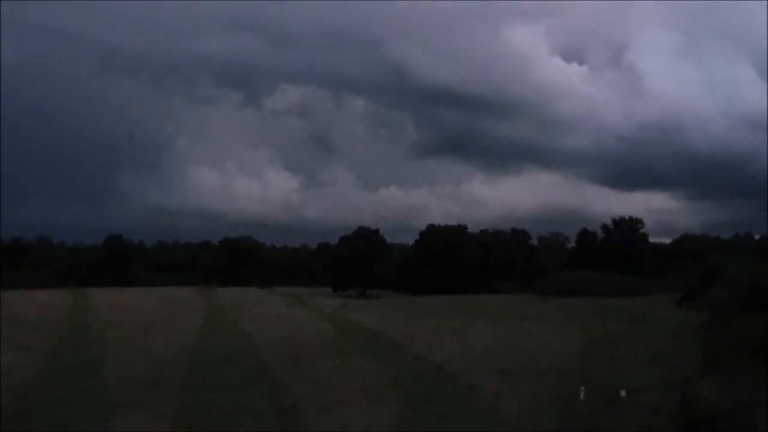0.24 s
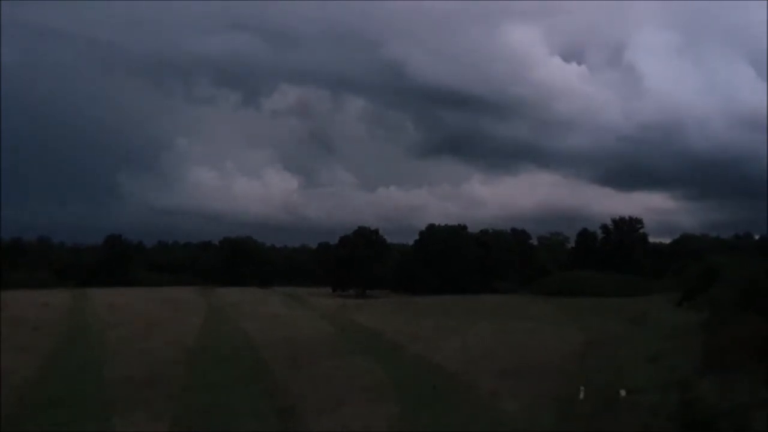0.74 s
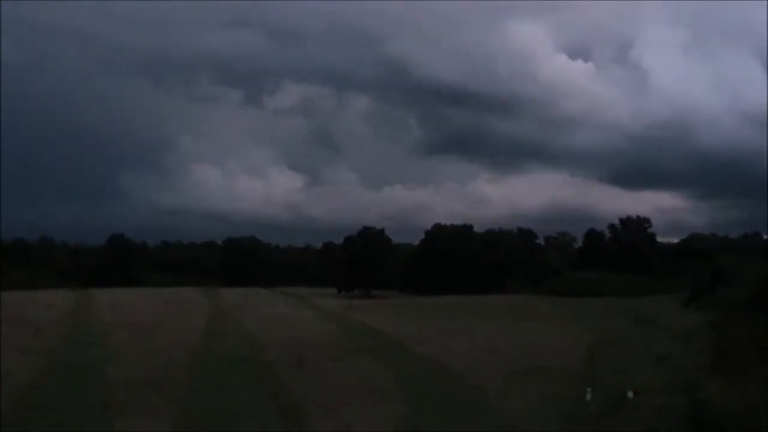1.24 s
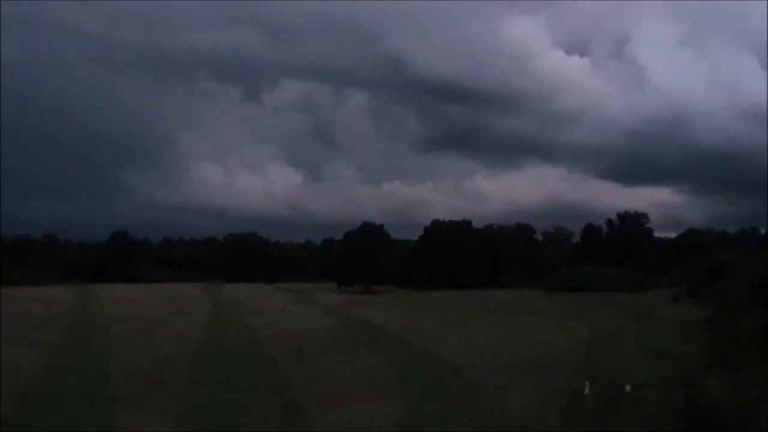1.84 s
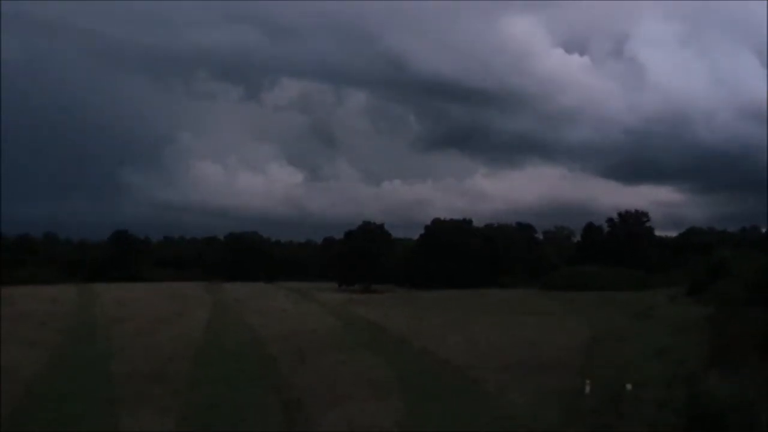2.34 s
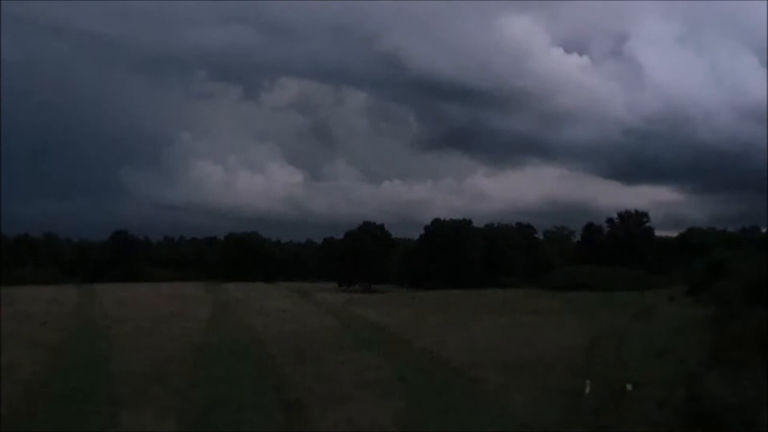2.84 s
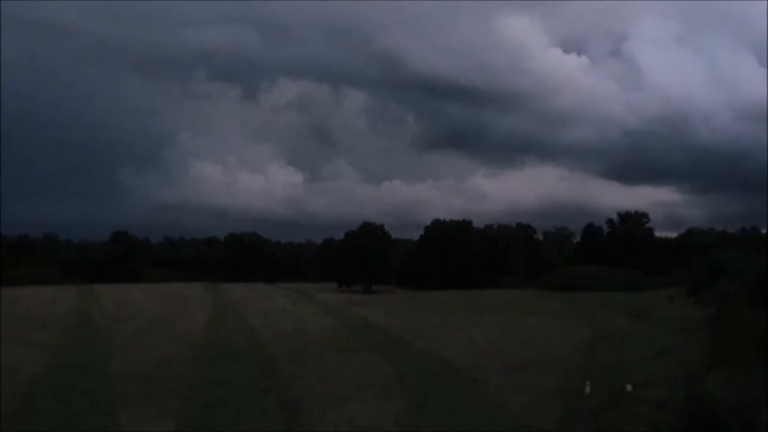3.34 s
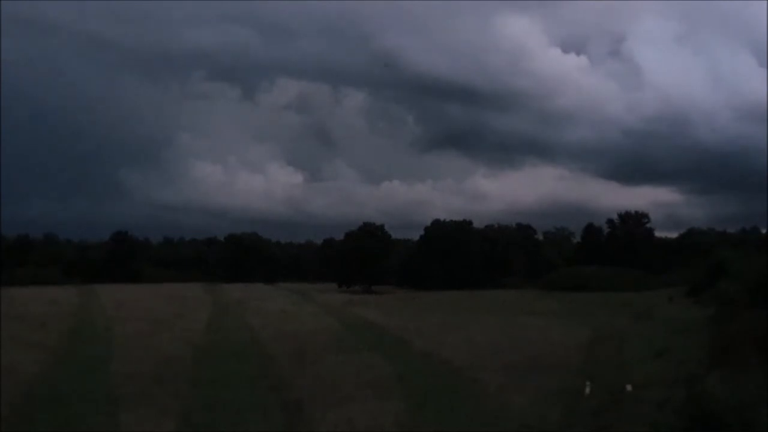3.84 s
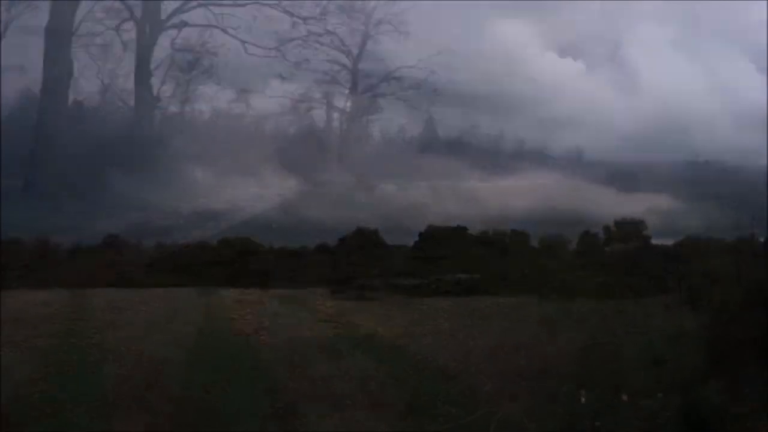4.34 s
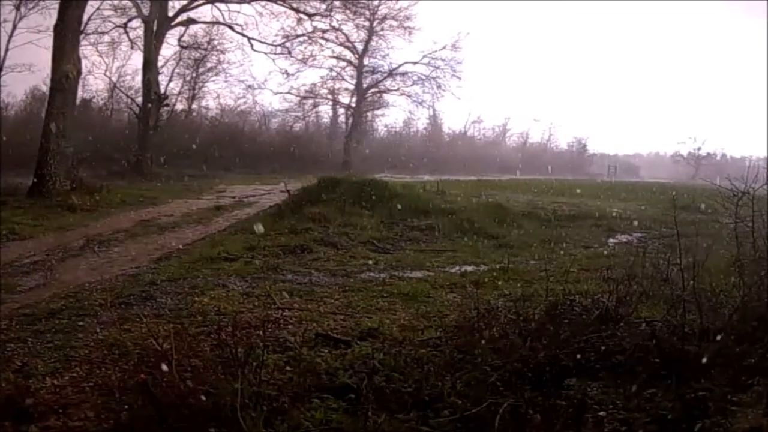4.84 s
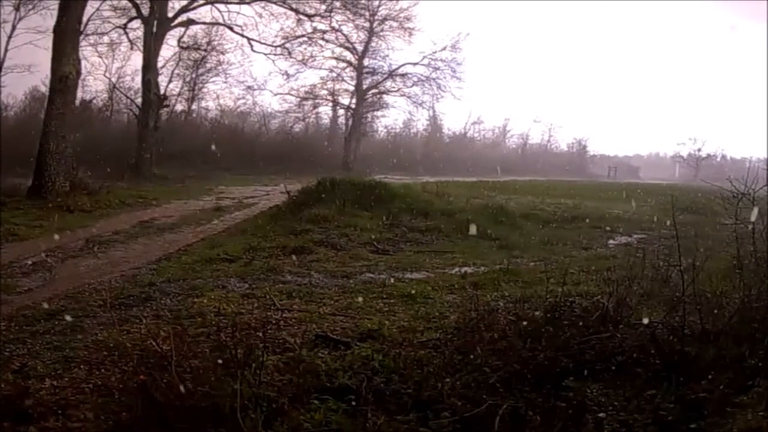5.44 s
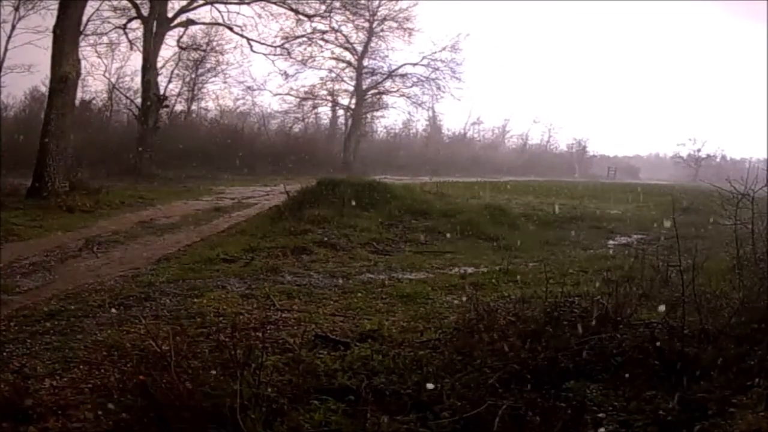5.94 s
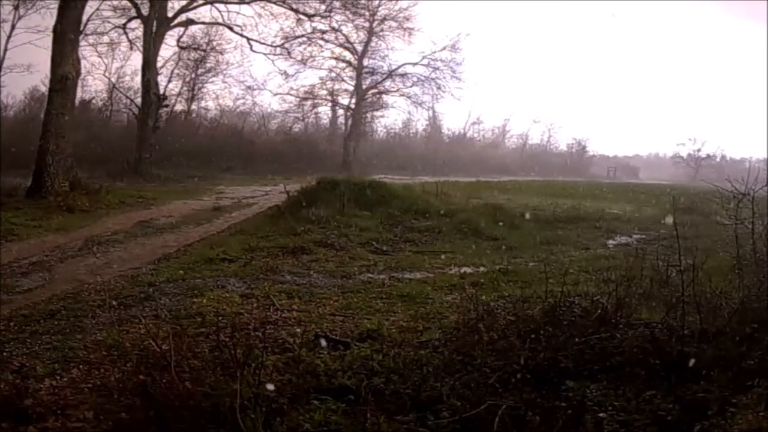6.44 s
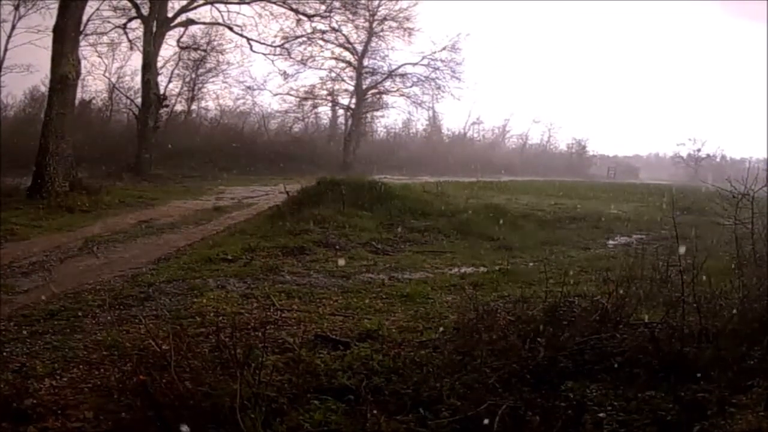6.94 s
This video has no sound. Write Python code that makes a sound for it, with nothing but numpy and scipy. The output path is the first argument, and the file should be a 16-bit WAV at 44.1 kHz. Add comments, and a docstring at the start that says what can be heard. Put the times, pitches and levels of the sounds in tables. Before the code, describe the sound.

Low far-off thunder rolls softly over a calm field, cutting suddenly to bright hissing rain, sharp hailstone ticks, hard knocks and wind buffeting.

```python
"""A field at dusk before a storm: a far rumble with a throbbing drone, first drops on leaves, thin bird
whistles. Then, abruptly, a mono downpour of rain and hail on grass: a bright hiss of countless impacts, sharp
ticks of near hailstones, two hard knocks on a casing by the microphone among fainter knocks and pats, and wind
buffeting it. Shaped noise makes the rumble, rain and wind; damped rings and filtered bursts make the impacts;
gliding sines make the birds."""
import sys
import numpy as np
from scipy import signal
from scipy.fft import rfft, irfft, next_fast_len
from scipy.io import wavfile
from scipy.ndimage import uniform_filter1d, map_coordinates

SR = 44100
rng = np.random.default_rng(int(sys.argv[2]) if len(sys.argv) > 2 else 0)


def output_pcm(signal):
    """Save a mono or channel-first signal as 16-bit PCM at the path in sys.argv[1].

    Samples are clipped to [-1, 1] before scaling.
    """
    pcm = np.clip(np.atleast_2d(signal).T, -1, 1) * 32767
    wavfile.write(sys.argv[1], SR, np.round(pcm).astype(np.int16))


N = 317961
TIME = np.arange(N) / SR  # seconds
CUT_S = 4.3765  # the calm ends and the downpour begins
TOP_HZ = 15800  # band limit of the recorder

# Colour of the rain's hiss. Each row: frequency in Hz, relative level in dB.
HISS_COLOUR = [(500, -10), (1500, -9.5), (3000, -7.5), (4500, -5), (6500, -.5), (9500, 1), (12000, -1.5),
               (14000, -7.5), (15200, -26), (16000, -32)]
# Colour of the patter on soil. Each row: frequency in Hz, relative level in dB.
PATTER_COLOUR = [(100, -13), (300, 7), (500, -2), (1000, -3), (2000, -1.5), (3200, 4.5), (6000, 2),
                 (12000, -40)]
# Colour of the wind on the microphone. Each row: frequency in Hz, relative level in dB.
WIND_COLOUR = [(4, -5), (14, 0), (28, -4), (42, -8.5), (60, -15.5), (100, -15.5), (160, -21.5), (250, -36),
               (600, -34.5)]
# Squalls that lift the rain. Each row: centre in seconds, half length in seconds, rise in dB.
SQUALL_SWELLS = [(4.42, 0.31, 5), (7.04, 0.16, 1.5)]
# Gusts on the microphone. Each row: centre in seconds, half length in seconds, rise in dB.
GUST_SWELLS = [(4.56, 0.2, 8.5), (4.94, 0.079, 3.5), (5.12, 0.083, 4.5), (5.72, 0.084, 3.5),
               (6.18, 0.072, 2), (6.75, 0.12, 4)]
HISS_DB, PATTER_DB, WIND_DB = -33, -44, -38.5  # base levels, between squalls and gusts
PATTER_FOLLOWS = 1.33  # dB of patter for each dB of squall


def downpour():
    """Far impacts merge into a hiss, nearer ones splash on grass and patter on soil; wind buffets the microphone."""
    squall_db = rise(SQUALL_SWELLS)
    patter_db = PATTER_DB + PATTER_FOLLOWS * squall_db + 0.86 * wobble(11)

    crackle = grains(count=14000, pitch_hz=8030, spread=0.7, cycles=0.94, size_db=3.0)
    splashes = spatter(count=900, size_db=3.0, t60=0.02) * noise(patchy_db=2.0)
    impacts = noise(patchy_db=1.0) + amp(-6.0) * crackle + amp(-2) * splashes
    hiss = amp(HISS_DB + squall_db + 0.4 * wobble(11)) * coloured(impacts, HISS_COLOUR)

    splats = grains(count=3500, pitch_hz=1710, spread=1.1, cycles=1.0, size_db=4.0)
    patter = amp(patter_db) * coloured(noise(patchy_db=2.0) + amp(-12) * splats, PATTER_COLOUR)
    low_rings = grains(count=300, pitch_hz=229.6, spread=0.57, cycles=4.2, size_db=3.0, size=2500)
    turf = amp(patter_db - 9) * low_rings

    gusting = amp(WIND_DB + rise(GUST_SWELLS))
    wind = gusting * steadied(coloured(noise(patchy_db=0.97), WIND_COLOUR), span=0.243)
    return hiss + patter + turf + wind


STRAY_DB, STRAY_HZ = -26.5, 5900  # middle peak level and pitch of the lesser stones


def strays(count):
    """Lesser stones scattered at random through the downpour, as rows of (seconds, peak dB, pitch Hz)."""
    rows = []
    for when, weight, tone in rng.random((count, 3)):
        s = CUT_S + when * (N / SR - CUT_S)
        rows.append((s, STRAY_DB + 4 * (weight - .5), STRAY_HZ * 2 ** (tone - .5)))
    return rows


# Near hailstones. Each row: nominal start in seconds, peak level in dB, pitch in Hz.
HAIL_TICKS = [(4.3842, -7, 9970), (4.4267, -6.5, 9620), (4.4553, -8, 5830), (4.494, -16, 7760),
              (4.6962, -18, 7930), (4.7224, -15, 5700), (4.8025, -12.5, 9760), (5.015, -12, 8420),
              (5.1971, -12.5, 7040), (5.3333, -12.5, 6200), (5.449, -12, 10800), (5.549, -18, 6140),
              (5.5868, -16, 6540), (5.841, -9, 9100), (5.9823, -15, 11200), (6.1365, -17, 9320),
              (6.7118, -14, 8450), (6.7401, -15, 5520), (6.781, -15.5, 6340), (7.003, -11, 10100),
              (7.0376, -8.5, 10800), (7.0758, -12, 7770), (7.1591, -10.5, 9800)]
# Dull thuds on the turf. Each row: start in seconds, nominal level in dB, pitch in Hz.
TURF_THUDS = [(4.44, -30.5, 307), (5.104, -27, 146), (5.299, -29, 347), (5.95, -30.5, 320),
              (6.368, -36.5, 328), (6.681, -33, 353)]
# Knocks and pats near the microphone. Each row: start in seconds, nominal level in dB, pitch of the crack in
# Hz, # dull push in dB relative to that level.
KNOCKS_AND_PATS = [(4.457, -26.5, 3000, -9), (4.543, -22.5, 3000, 0), (4.5704, -7.5, 4430, -29),
                   (4.808, -28, 3000, -4), (4.917, -26.5, 1990, -22), (5.934, -32.5, 1560, -12),
                   (6.369, -35.5, 1800, -15), (6.6397, -11.5, 3370, -8), (6.7197, -30, 2500, 4.5),
                   (6.756, -30, 4000, 2)]
# The casing's ringing modes. Each row: frequency in Hz, nominal level in dB, time to fall 60 dB in seconds.
CASING_MODES = [(867, -7, 0.015), (945, -6.5, 0.027), (1212, -3.5, 0.031), (1860, -7.5, 0.029),
                (2900, -6.5, 0.02), (3360, -1, 0.014), (4900, -13, 0.0085), (5250, -3, 0.012),
                (8100, -8, .012)]


def hailstones():
    """Near stones tick on twigs as noise bursts, thud into the turf as damped sines or ring the casing's modes."""
    out, casing = np.zeros(N), np.zeros(N)
    t = np.arange(SR // 8) / SR
    for s, db, hz in list(HAIL_TICKS) + strays(count=12):
        stone = tick(hz, t60=0.0043, splash_db=-12.0, splash_t60=0.037)
        add(out, s + 0.0009, amp(db) * stone)

    for s, db, hz in TURF_THUDS:
        envelope = amp(-60 * t / 0.079) * (1 - np.exp(-t / 0.0021))
        add(out, s, amp(db) * np.sin(2 * np.pi * hz * t) * envelope)

    for s, db, crack_hz, push_db in KNOCKS_AND_PATS:
        ring = np.zeros(len(t))
        for hz, level, t60 in CASING_MODES:
            # Each blow excites the modes a little differently.
            decay = amp(level + rng.normal(0, 1.0) - 60 * t / t60)
            ring += decay * np.sin(2 * np.pi * (hz * t + rng.random()))
        crack = tick(crack_hz, t60=0.034, splash_db=-20, splash_t60=0.046)
        shatter = tick(13000, t60=0.012, splash_db=-24, splash_t60=.03)  # the ice breaks
        push = np.sin(2 * np.pi * 600 * t) * amp(-60 * t / 0.0067)
        add(casing, s, amp(db - 2.5) * ring * (1 - np.exp(-t / 0.00023)))
        add(casing, s, amp(db - 1.5) * crack)
        add(casing, s, amp(db - 3.5) * shatter)
        add(out, s, amp(db + push_db) * push)

    # The rings, cracks and shatters of the knocks and pats carry nothing below 700 Hz; only their dull push
    # sounds lower.
    highpass = signal.butter(N=4, Wn=700, btype="highpass", fs=SR, output="sos")
    return out + signal.sosfilt(highpass, casing)


# Level of the far rumble. Each row: time in seconds, level in dB that the roll takes and the rest follow.
RUMBLE_LEVEL = [(0.05, -54), (0.35, -50.5), (0.49, -46.5), (1.22, -51), (1.56, -48), (2.26, -45.5),
                (2.75, -49), (2.87, -51.5), (3.36, -52), (4.11, -53), (4.25, -51)]
# Colour of the deep layer. Each row: frequency in Hz, relative level in dB.
DEEP_COLOUR = [(8, -39), (20, -18), (38, 5.5), (58, -14), (75, -5), (100, -30), (200, -75)]
# Colour of the drone. Each row: frequency in Hz, relative level in dB.
DRONE_COLOUR = [(60, -39), (86, -11), (98, 2.5), (106, 9), (118, -10.5), (135, -8.5), (190, -75)]
# Colour of the roll. Each row: frequency in Hz, relative level in dB.
ROLL_COLOUR = [(70, -38), (130, 0.5), (190, -0.5), (245, -3), (290, -7.5), (400, -11), (520, -18),
               (800, -28.5), (1400, -38.5), (4000, -62.5)]
# Surges of the deep layer. Each row: centre in seconds, level in dB.
DEEP_SURGES = [(.08, -38), (.3, -40), (.87, -40), (1.43, -31.5), (1.76, -36.5), (2.22, -43), (2.37, -39),
               (3.34, -39.5), (3.69, -42)]
# Throbs of the drone. Each row: centre in seconds, level in dB.
DRONE_THROBS = [(.15, -44), (.44, -35), (.7, -35), (.81, -41), (1.05, -36.5), (1.63, -36.5), (2.0, -32),
                (2.21, -38.5), (2.39, -40), (2.59, -41), (3.51, -42), (4.06, -41.5), (4.2, -39.5)]
# Level of the faint hum. Each row: time in seconds, level in dB about which it wavers.
HUM_LEVEL = [(0, -58.5), (1.3, -60.5), (2.1, -48), (2.8, -49.5), (3.4, -57), (4.4, -64)]
# The hum's tones. Each row: centre frequency in Hz, relative level in dB.
HUM_PARTIALS = [(261, -2.5), (403, -12)]
DEEP_DB, DRONE_DB = -47, -46.5  # base levels between surges and throbs
DEEP_FOLLOWS, DRONE_FOLLOWS = .2, 0.86  # share of the rumble's rise and fall, in dB per dB
SURGE_S, THROB_S = 0.047, 0.042  # half lengths in seconds


def rumble():
    """One level drives three noise layers: a surging deep one, a throbbing drone and a roll; a hum wavers within."""
    level_db, = curves(RUMBLE_LEVEL)
    change_db = level_db - level_db[TIME < CUT_S].mean()

    def layer(colour, span):
        return steadied(wide(noise(patchy_db=1), noise(patchy_db=0.93), colour), span)

    deep_gain = swelling(DEEP_DB + DEEP_FOLLOWS * change_db, DEEP_SURGES, SURGE_S)
    drone_gain = swelling(DRONE_DB + DRONE_FOLLOWS * change_db, DRONE_THROBS, THROB_S)
    deep = deep_gain * layer(DEEP_COLOUR, span=0.17)
    drone = drone_gain * layer(DRONE_COLOUR, span=0.096)
    roll = amp(level_db) * layer(ROLL_COLOUR, span=0.19)

    hum = np.zeros(N)
    for hz, db in HUM_PARTIALS:
        phase = 2 * np.pi * np.cumsum(hz + 3.42 * wobble(18)) / SR
        hum += amp(db) * np.sin(phase)
    hum_db = curves(HUM_LEVEL)[0] + 2.2 * wobble(9)
    return deep + drone + roll + amp(hum_db) * hum


# Soft booms within the rumble. Each row: centre in seconds, peak level in dB, centre pitch in Hz,
# half length in seconds.
SOFT_BOOMS = [(0.454, -38, 224.3, 0.06), (0.647, -45, 235.3, 0.081), (1.064, -50.5, 220.4, 0.084),
              (2.02, -46, 192.7, 0.07), (2.134, -41.5, 255.7, 0.071), (3.71, -47.5, 174.4, .08)]


def booms():
    """Brief narrow swells that rise out of the rumble: sines of wavering pitch."""
    out = np.zeros(N)
    for s, db, hz, length in SOFT_BOOMS:
        phase = 2 * np.pi * np.cumsum(hz + 9 * wobble(35)) / SR
        out += amp(db) * swell(s, length) * np.sin(phase)
    return out


# Level of the rustle. Each row: time in seconds, level in dB before a fixed lift.
RUSTLE_LEVEL = [(0.0, -65), (1.23, -66.5), (1.59, -68), (4.01, -68.5), (4.3, -71.5)]
# Colour of the rustle. Each row: frequency in Hz, relative level in dB.
LEAF_COLOUR = [(200, 3), (600, 7.5), (1100, 1), (2000, -0.5), (3500, -3.5), (7000, -6), (11000, -8),
               (13300, -10.5), (13900, -34), (16000, -54)]
# First drops on leaves. Each row: start in seconds, peak level in dB before panning, pitch in Hz.
FIRST_DROPS = [(.268, -49, 4500), (.481, -50, 5500), (.714, -49, 5000), (1.027, -52, 1000),
               (1.304, -42, 1600), (1.980, -45, 1850), (2.105, -52, 2000), (2.577, -50, 5500),
               (3.100, -52, 4500), (3.52, -47, 2290), (3.554, -53, 5000), (3.724, -55, 9250),
               (3.913, -45.5, 4470)]


def leaves():
    """A faint noise rustle sprinkled with drizzle, and the first single drops as short bursts."""
    drizzle = spatter(count=450, size_db=3.5, t60=0.062)

    def sprinkle():
        rustle = noise(patchy_db=2)
        splashes = drizzle * noise(patchy_db=1.5)
        specks = grains(count=3000, pitch_hz=7400, spread=0.55, cycles=.9, size_db=1.0)
        return rustle + amp(-5) * splashes + amp(-8.0) * specks

    out = amp(curves(RUSTLE_LEVEL)[0] + 4.5) * wide(sprinkle(), sprinkle(), LEAF_COLOUR)
    for s, db, hz in FIRST_DROPS:
        pan = amp(rng.normal(0, 1.7) * np.array([[1], [-1]]))
        add(out, s, amp(db) * pan * tick(hz, t60=0.01, splash_db=-8, splash_t60=0.082))
    return out


# Far birds, a row for each whistle. Each row: start in seconds, length in seconds, first pitch in Hz,
# last pitch in Hz, nominal level in dB, depth of random flutter as a share of the pitch.
BIRD_WHISTLES = [(0, .7, 2530, 2146, -70, .05), (1.792, 0.54, 2530, 2115, -70, 0.054),
                 (3.817, .055, 2800, 2700, -69, .025), (3.985, .09, 2740, 2730, -70, .03),
                 (4.05, .06, 2560, 2470, -67, .04), (4.114, .12, 2270, 2218, -66, .018),
                 (4.2, .11, 1970, 1900, -62, .022)]
GLIDE_RATE = 2.6  # exponent: higher settles the pitch sooner
WHISTLE_ATTACK, WHISTLE_FADE_DB = .14, 3.5  # share of the length spent at each edge, dB lost by the end


def birds():
    """Sines that fall and settle, their pitch fluttering, smeared by the echo of the far trees."""
    song = np.zeros(N)
    for s, length, first_hz, last_hz, db, flutter in BIRD_WHISTLES:
        u = np.clip((TIME - s) / length, 0, 1)  # progress through the whistle
        hz = last_hz + (first_hz - last_hz) * (1 - u) ** GLIDE_RATE
        edges = np.clip(np.minimum(u, 1 - u) / WHISTLE_ATTACK, 0, 1)
        sounding = edges * amp(-WHISTLE_FADE_DB * u)
        phase = 2 * np.pi * np.cumsum(hz * (1 + flutter * wobble(260))) / SR
        song += sounding * amp(db + 0.78 * wobble(27.78)) * np.sin(phase)

    t = np.arange(SR) / SR
    woods = rng.standard_normal((2, SR)) * (amp(-60 * t / 0.15) + amp(-9 - 60 * t / .8))
    echo = signal.fftconvolve(song[None], woods / np.linalg.norm(woods[0]), axes=1)[:, :N]
    return amp(-0.5) * song + amp(1.5) * echo


def tick(pitch_hz, t60, splash_db, splash_t60):
    """One impact of peak 1: a noise crack and its splash, in a broad band around its pitch."""
    t = np.arange(SR // 25) / SR
    decay = amp(-60 * t / t60) + amp(splash_db - 60 * t / splash_t60)
    burst = np.sign(rng.standard_normal(len(t))) * decay
    band = [pitch_hz * .55, min(pitch_hz * 1.7, 13000)]
    y = signal.sosfilt(signal.butter(2, band, "bandpass", fs=SR, output="sos"), burst)
    return y / np.abs(y).max()


def grains(count, pitch_hz, spread, cycles, size_db, size=200):
    """Countless impacts at random times: damped rings, most of them small, a few large."""
    when, chance, tone, phase = rng.random((count, 4)).T[:, :, None]
    hz = np.minimum(pitch_hz * np.exp(spread * (2 * tone - 1)), TOP_HZ)
    turns = hz * np.arange(size) / SR
    strength = amp(-size_db * np.log(np.maximum(chance, .004)))
    polarity = np.sign(phase - .5)
    rings = strength * np.exp(-turns / cycles) * np.sin(2 * np.pi * turns) * polarity
    index = (when * N).astype(int) + np.arange(size)
    return unit(np.bincount(index.ravel(), rings.ravel(), N + size)[:N])


def spatter(count, size_db, t60):
    """Loudness of overlapping splashes: each starts at once and its energy dies away."""
    when, chance = rng.random((count, 2)).T
    energy = amp(-size_db * np.log(np.maximum(chance, .05))) ** 2
    hits = np.bincount((when * N).astype(int), energy, N)
    keep = amp(-60 / (t60 * SR)) ** 2  # energy kept from sample to sample
    return unit(np.sqrt(signal.lfilter([1], [1, -keep], hits)))


def noise(patchy_db):
    """White noise with patches of random gain in time and frequency."""
    z = signal.stft(rng.standard_normal(N), nperseg=512)[2]
    field = uniform_filter1d(rng.standard_normal(z.shape), size=8, axis=0)
    field = uniform_filter1d(field, size=10, axis=1)
    return unit(signal.istft(z * amp(patchy_db * unit(field)), nperseg=512)[1][:N])


# Left-right likeness of the calm air. Each row: frequency in Hz, coherence from 0 to 1.
LIKENESS = [(25, 1), (60, 0.98), (120, 0.99), (200, 0.95), (400, 0.91), (800, .72), (1400, .5),
            (2500, 0.32), (5000, 0.00079), (12000, 0)]


def wide(a, b, spectrum):
    """Two unrelated signals as a stereo field: alike in the bass, unrelated in the treble."""
    def mid_side_gains(hz):
        turn = np.arccos(np.clip(along(LIKENESS, hz), -1, 1)) / 2
        return np.array([np.cos(turn), np.sin(turn)])

    mid, side = filtered(np.array([a, b]), mid_side_gains)
    return coloured(np.array([mid + side, mid - side]), spectrum)


def steadied(x, span):
    """x with its slow swells divided out, over a span in seconds."""
    power = uniform_filter1d(np.mean(np.atleast_2d(x) ** 2, axis=0), max(2, int(span * SR)))
    return x / np.sqrt(np.abs(power) + 1e-6)


def coloured(x, spectrum):
    """x filtered by (Hz, dB) points, at rms 1."""
    return unit(filtered(x, lambda hz: amp(along(spectrum, hz))))


def filtered(x, response):
    """x times a response of frequency."""
    size = x.shape[-1]
    m = next_fast_len(size + 8192)
    return irfft(rfft(x, m) * response(np.fft.rfftfreq(m, 1 / SR)), m)[..., :size]


def along(points, hz):
    """Read (Hz, value) points on a log axis."""
    f, v = np.transpose(points)
    return np.interp(np.log(hz + 1), np.log(f + 1), v)


def curves(rows):
    """One value per sample for each column after the time."""
    s, *cols = np.transpose(rows)
    return [np.interp(TIME, s, c) for c in cols]


def wobble(rate):
    """A smooth random curve, rate knots a second."""
    return map_coordinates(rng.standard_normal(int(N * rate / SR) + 4), [TIME * rate])


def swell(s, length):
    """A smooth rise and fall around time s, down to 1/e at the half length."""
    return np.exp(-((TIME - s) / length) ** 2)


def swelling(base_db, events, length):
    """Gain of a layer whose base level and (seconds, dB) swells add as power."""
    return np.sqrt(amp(base_db) ** 2 + sum((amp(db) * swell(s, length)) ** 2 for s, db in events))


def rise(events):
    """Decibels added by (seconds, half length, dB) swells."""
    return sum(db * swell(s, length) for s, length, db in events)


def amp(db):
    """Decibels to gain."""
    return 10 ** (np.asarray(db) / 20)


def unit(x):
    """Scale to rms 1."""
    return x / np.sqrt(np.mean(x ** 2) + 1e-20)


def add(track, s, sound):
    """Mix a sound into a track at time s."""
    start = max(0, round(s * SR))
    part = track[..., start:start + sound.shape[-1]]
    part += sound[..., :part.shape[-1]]


def scene():
    """The calm in stereo, then all at once the storm in mono."""
    tilt = amp([[.25], [-.25]])  # the rumble leans slightly left
    calm = (rumble() + booms()) * tilt + leaves() + birds()
    return np.where(TIME < CUT_S, calm, downpour() + hailstones())


def record(dry):
    """The recorder rounds off the highest peaks and cuts steeply above its band limit."""
    rounded = dry / (1 + np.abs(dry / .6) ** 4) ** (1 / 4)
    return filtered(rounded, lambda hz: 1 / np.sqrt(1 + (hz / TOP_HZ) ** 400))


dry = scene()
out = record(dry)
output_pcm(out)
```